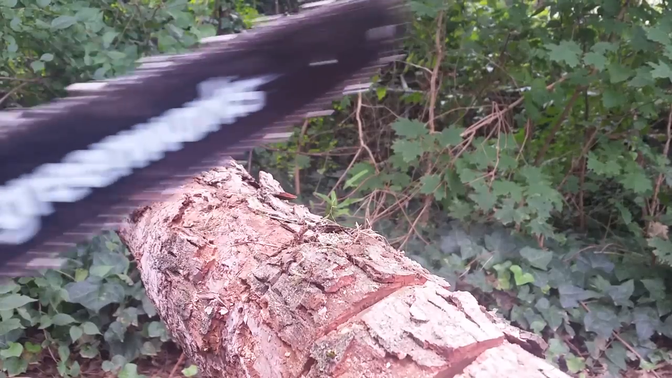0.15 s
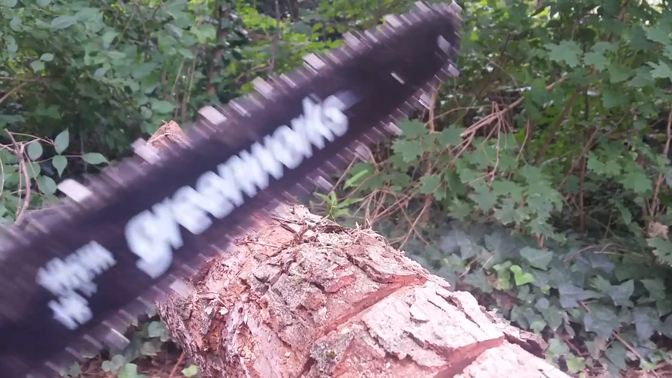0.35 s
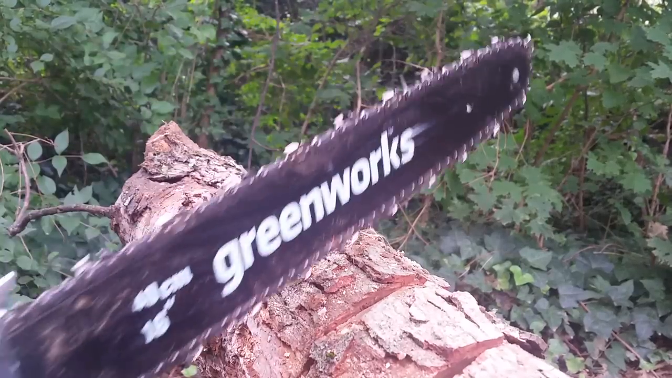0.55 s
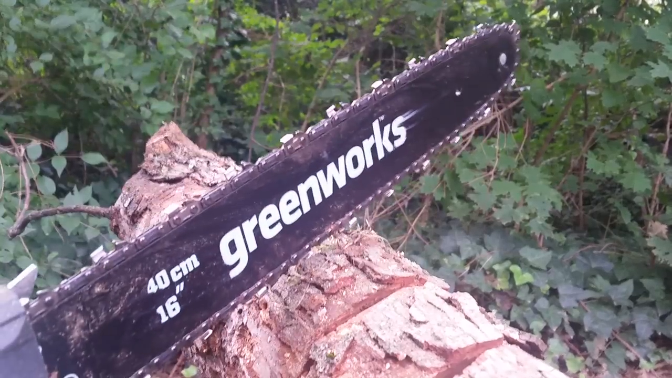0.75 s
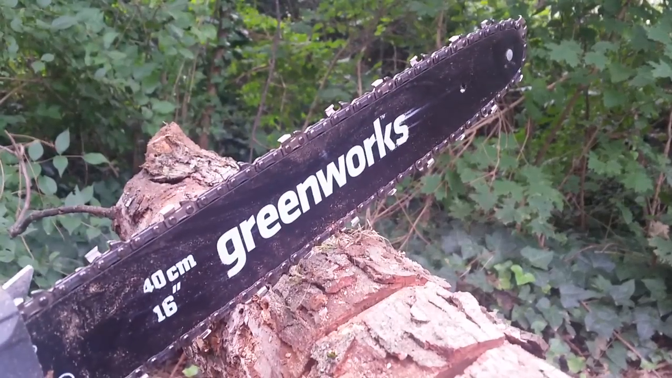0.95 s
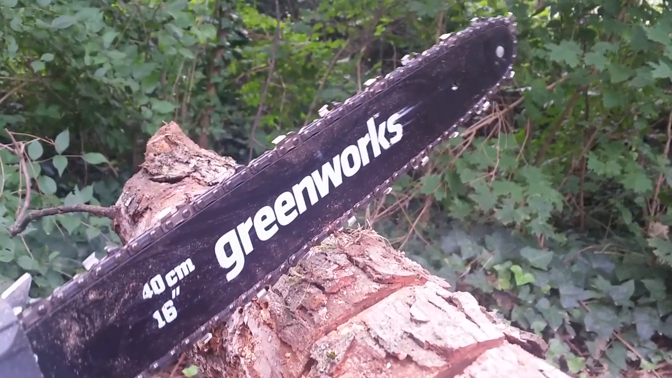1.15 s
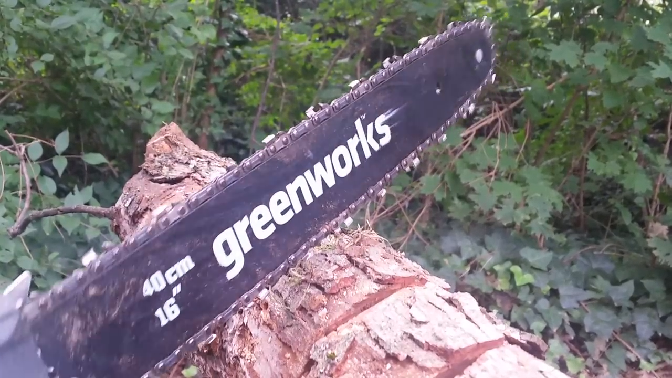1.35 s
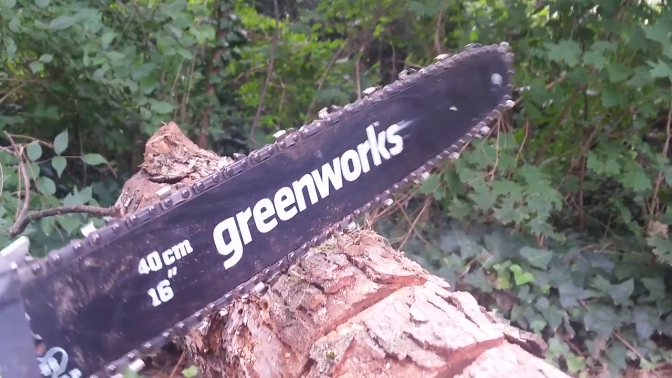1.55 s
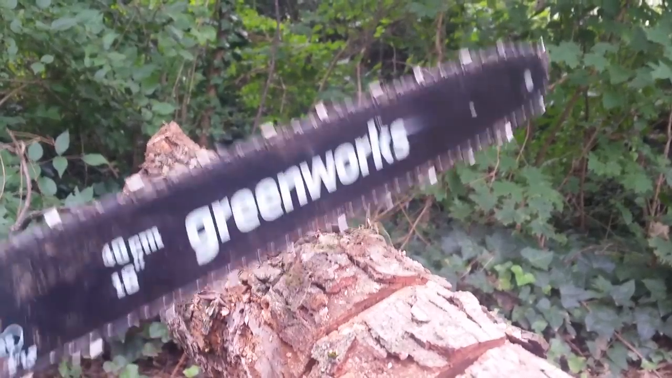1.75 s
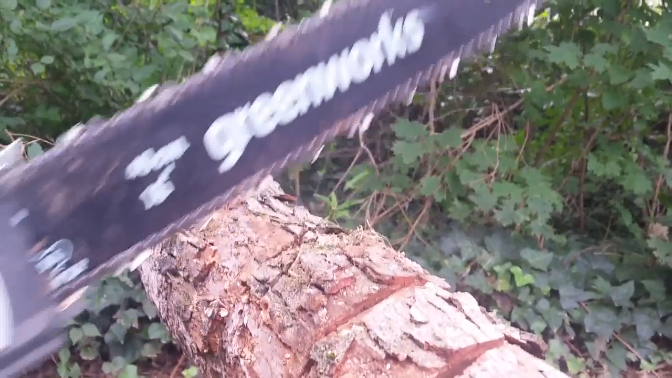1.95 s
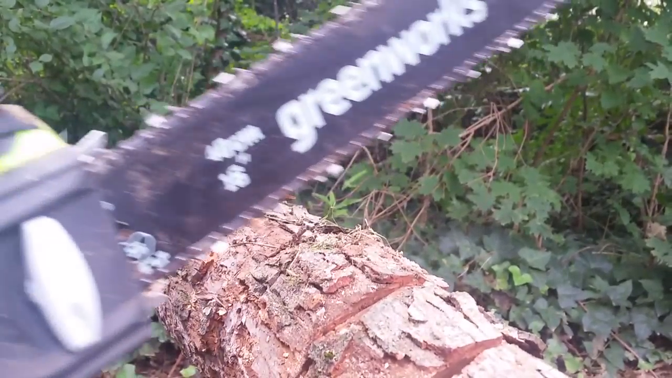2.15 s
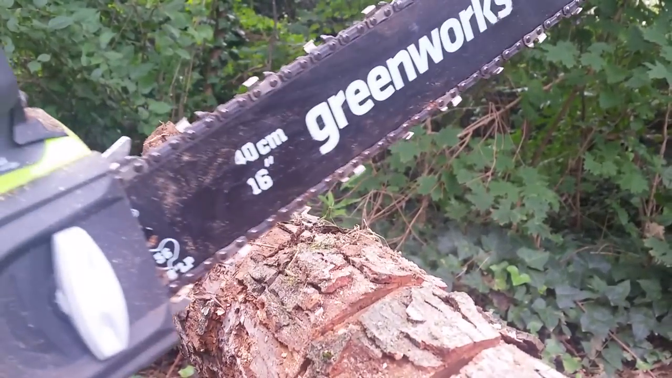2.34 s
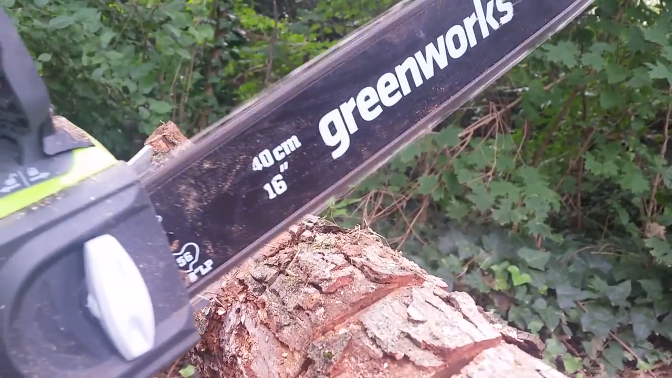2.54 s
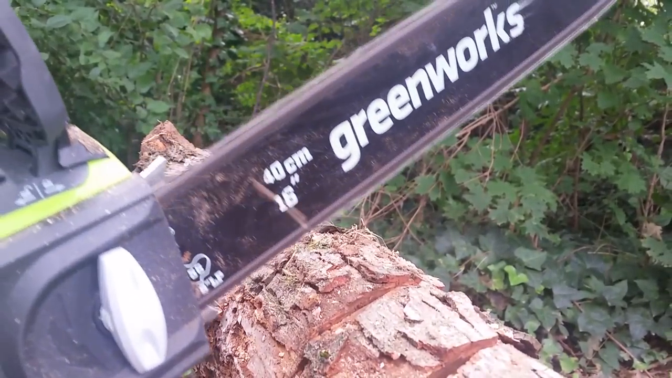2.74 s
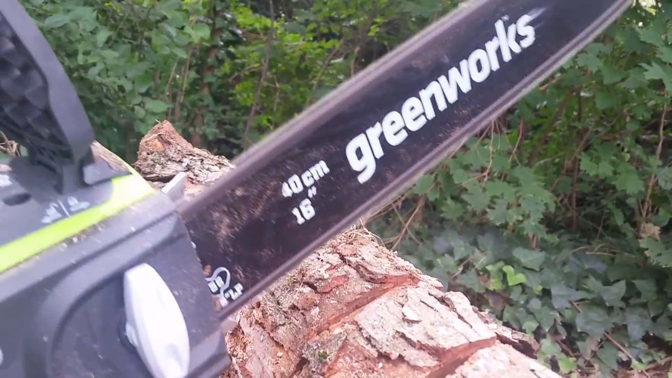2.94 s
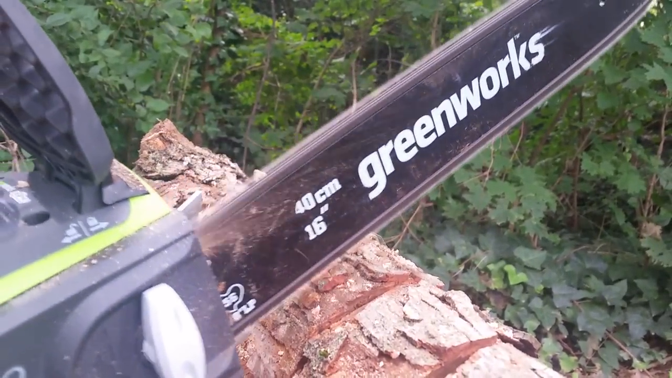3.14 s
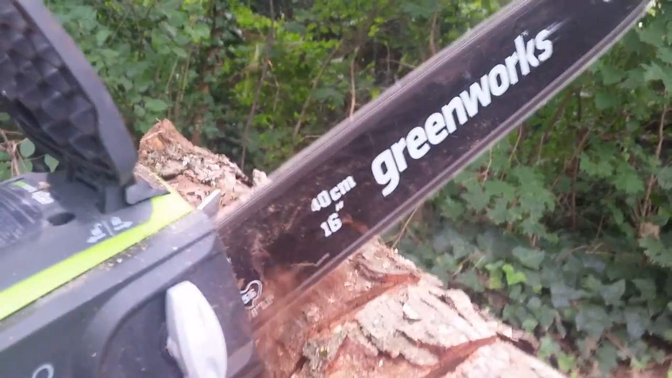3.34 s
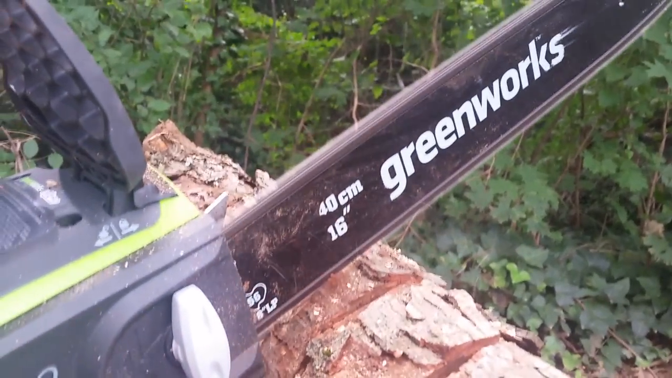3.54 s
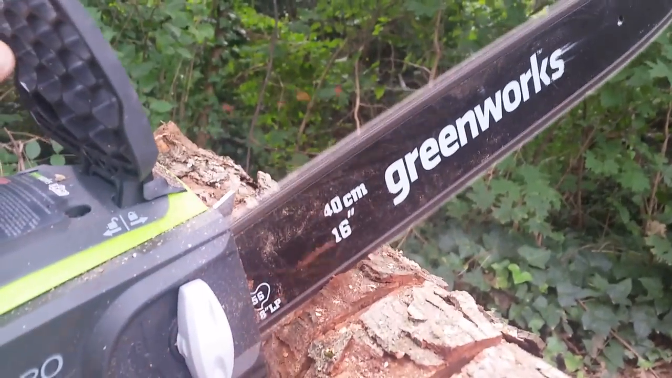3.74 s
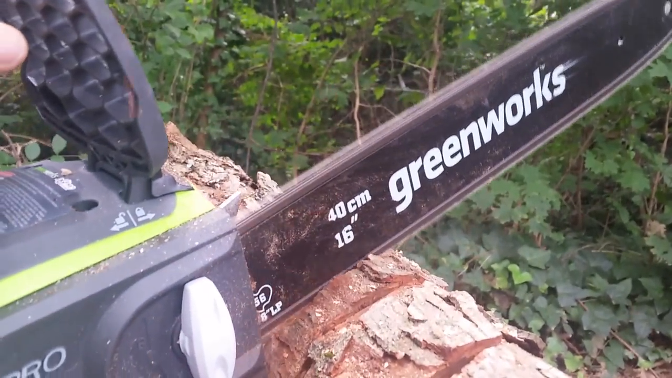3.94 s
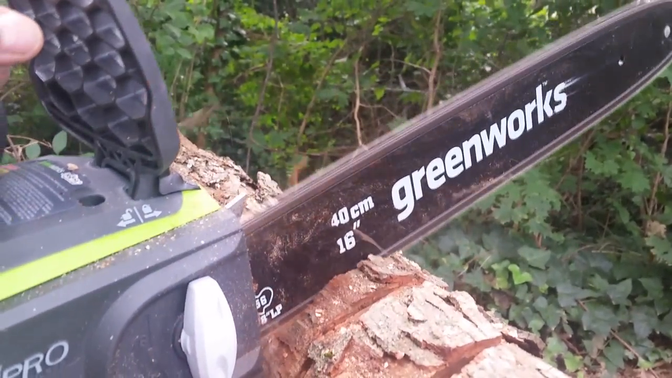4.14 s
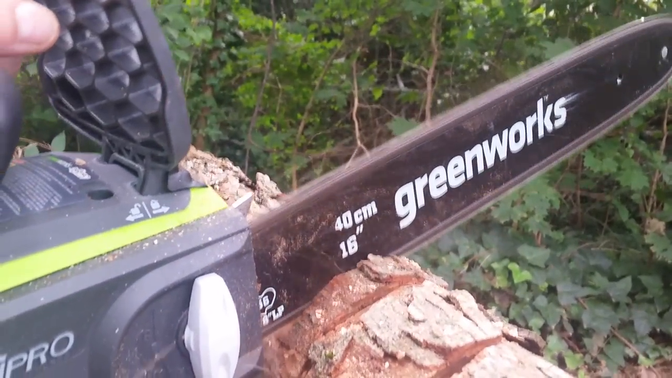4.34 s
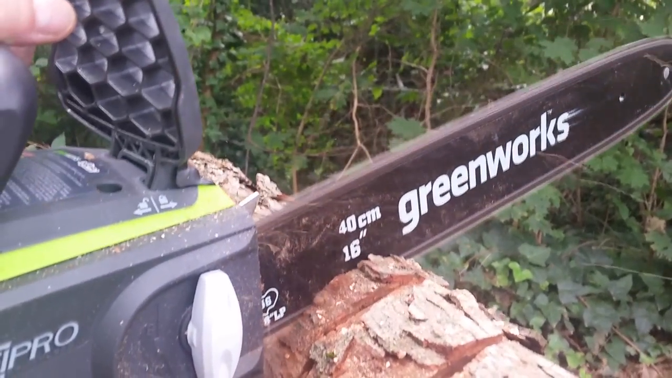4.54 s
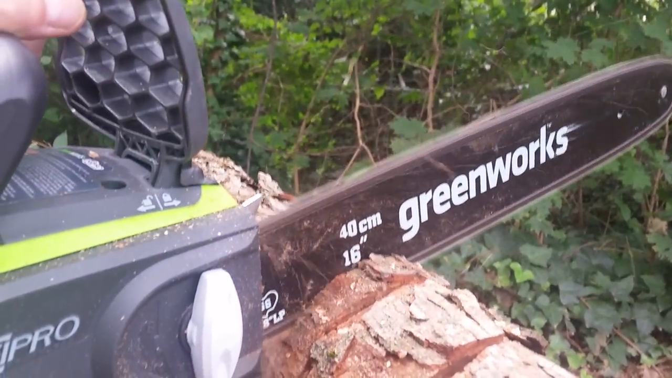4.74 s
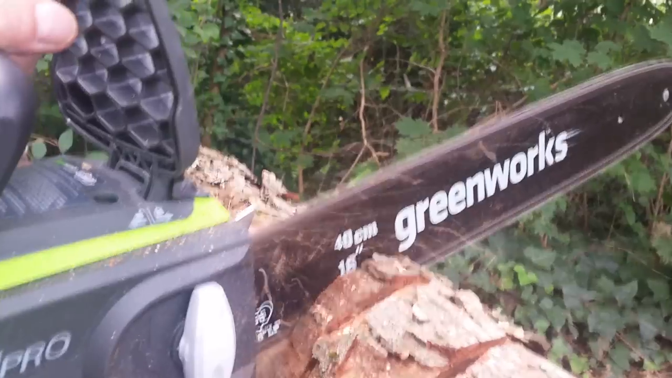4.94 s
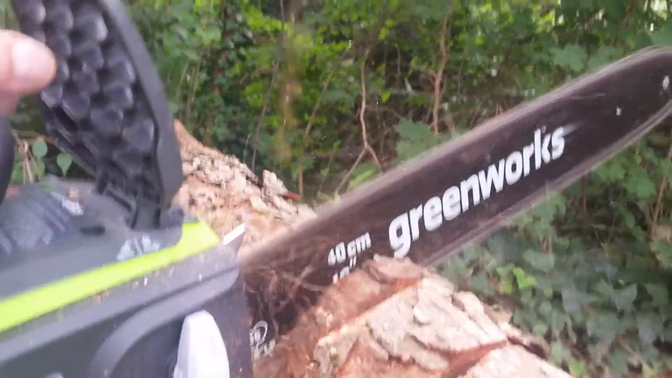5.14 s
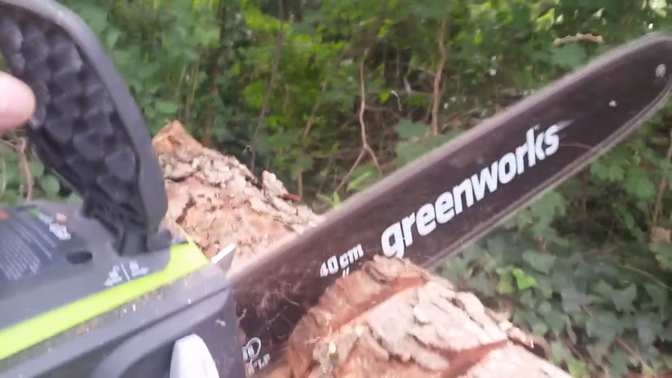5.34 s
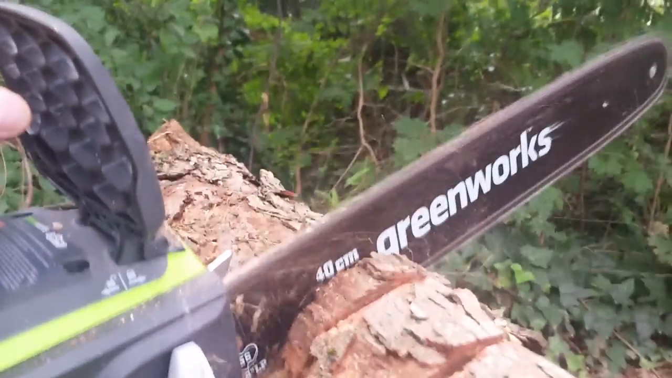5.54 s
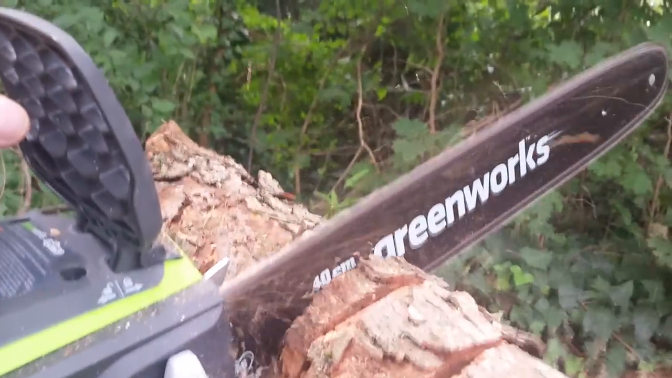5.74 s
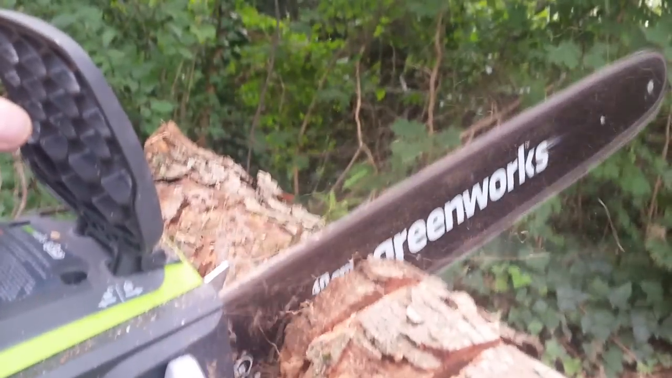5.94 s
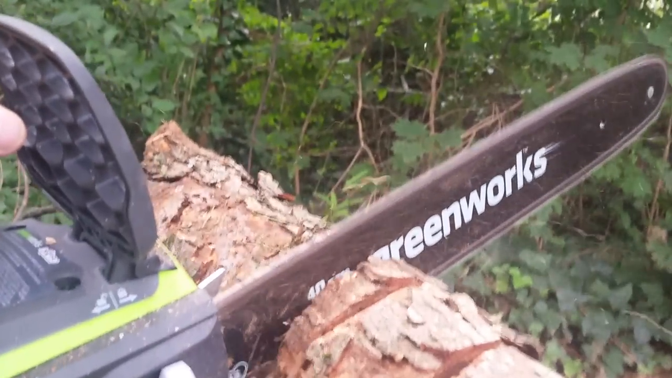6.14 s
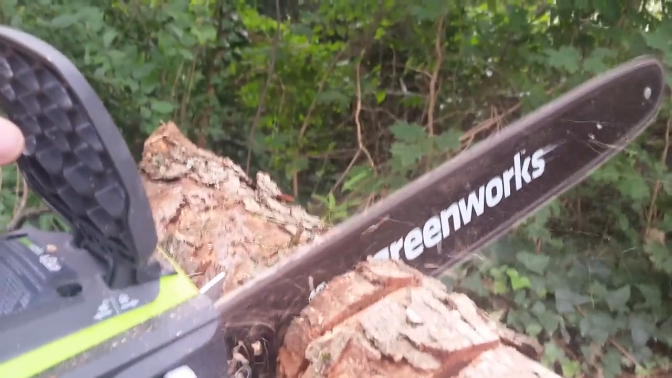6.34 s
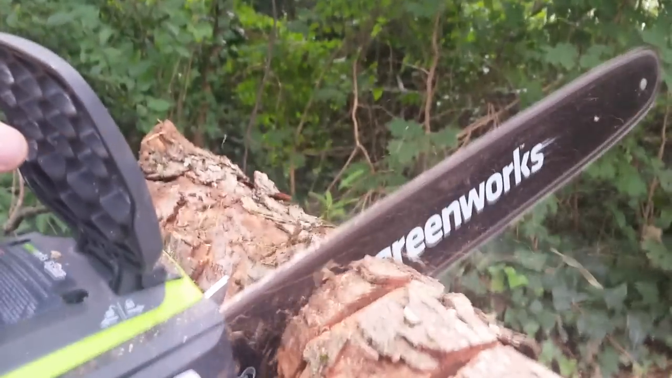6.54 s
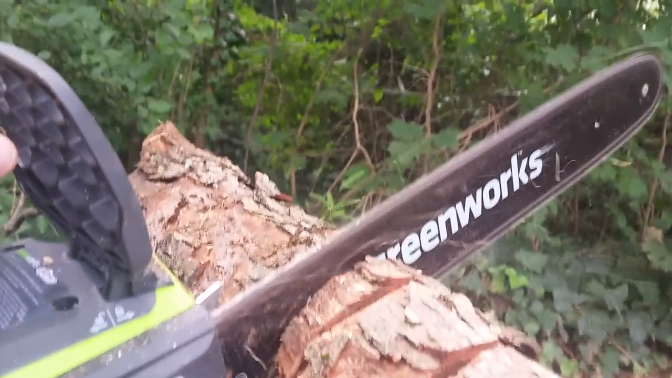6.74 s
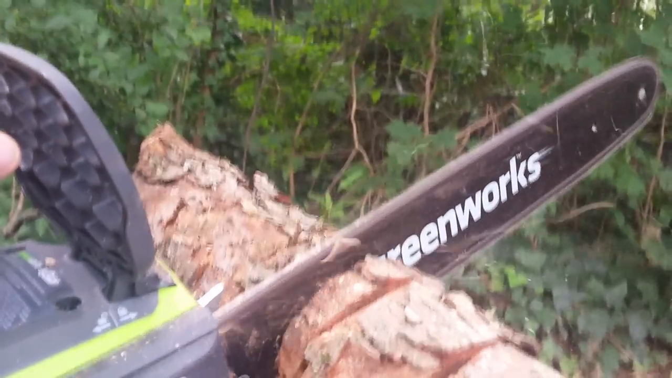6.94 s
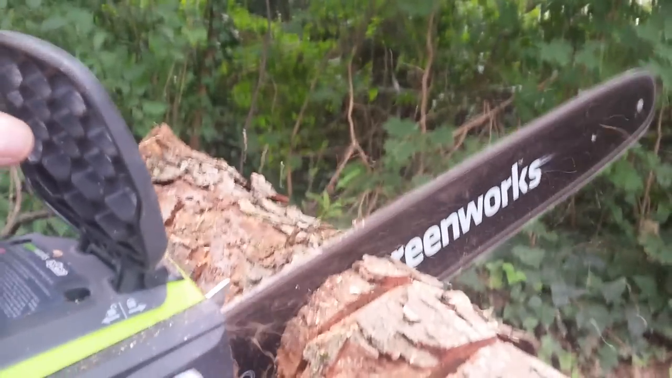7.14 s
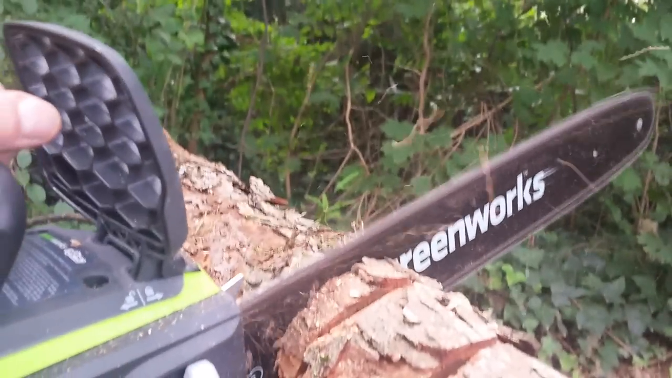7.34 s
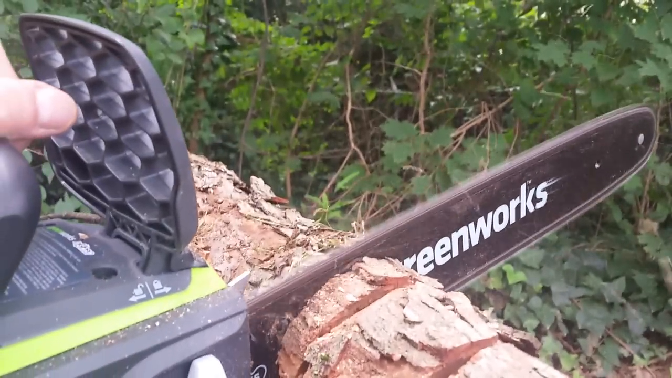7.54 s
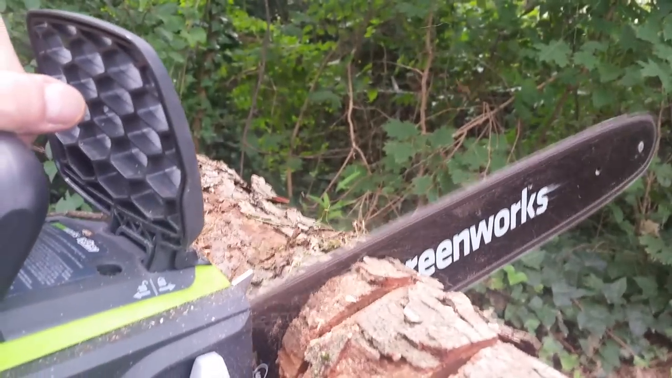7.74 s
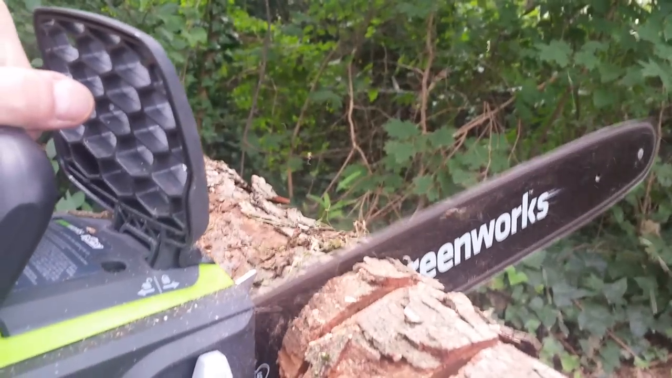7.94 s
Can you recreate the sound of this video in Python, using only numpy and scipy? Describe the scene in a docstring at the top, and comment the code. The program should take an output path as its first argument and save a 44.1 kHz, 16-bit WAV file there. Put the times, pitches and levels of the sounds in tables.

```python
"""Battery chainsaw in a quiet garden

A battery chainsaw is carried to a log, its hollow housing bumping and ticking in the hands: clicks set tones ringing.
The chain snaps taut, whines up to speed and sinks into the wood: tones and bursts of noise follow every link.
Links clatter round the sprocket and bar, cutters chatter in the kerf (the slot they cut) and chips spray.
The motor sags and recovers with the load. Filtered noise makes the garden air and the insects."""
import sys
import numpy as np
from scipy import signal
from scipy.fft import rfft, irfft, next_fast_len
from scipy.io import wavfile
from scipy.ndimage import uniform_filter1d

SR = 44100
rng = np.random.default_rng(int(sys.argv[2]) if len(sys.argv) > 2 else 0)


def generate_wav(signal):
    """Clip the signal to [-1, 1] and save it as 16-bit WAV at the path in sys.argv[1]."""
    frames = np.transpose(np.atleast_2d(signal))
    scaled = np.clip(frames, -1, 1) * 32767
    pcm = np.round(scaled).astype(np.int16)
    wavfile.write(sys.argv[1], SR, pcm)


N = 356328
TIME = np.arange(N) / SR  # seconds
SIZE = next_fast_len(N + SR // 2)
BINS = np.maximum(np.arange(SIZE // 2 + 1) * SR / SIZE, 1)  # Hz

# Colour of a high hiss, for flying chips and the sliding hand. Each row: pitch in Hz, level in dB per Hz.
HISS_SPECTRUM = [(4000, -14.5), (8600, -9.5), (10000, -3), (11500, -1), (12600, -2.5), (14000, -3),
                 (15800, -1.65)]

# The motor starts and gains speed evenly until the wood holds it back.
START_S, START_LINKS_PER_S, GAIN_LINKS_PER_S2 = 2.528, 52, 848
# The chain meets the bark, and its cutters take a moment to enter.
BITE_S, BITE_RISE_S = 3.07, 0.025
# Chain speed with no load and with the heaviest load.
FREE_LINKS_PER_S, LOADED_LINKS_PER_S = 577, 505


def from_db(db):
    """Turn decibels into a gain."""
    return 10 ** (np.asarray(db) / 20)


def rms_one(x):
    """Scale so that the mean of the channels has an rms (average strength) of 1."""
    return x / np.sqrt(np.mean(np.atleast_2d(x).mean(0) ** 2) + 1e-20)


def in_time(rows):
    """Draw straight lines between the points of a table, for each column at every sample."""
    s, *columns = np.transpose(rows)
    return [np.interp(TIME, s, column) for column in columns]


def at_hz(points, hz=BINS):
    """Read a curve over pitch on a log-frequency axis."""
    f, value = np.transpose(points)
    return np.interp(np.log(hz), np.log(f), value)


def lift(resonances, hz):
    """Add up the gains in dB of a set of resonances at these frequencies."""
    return sum(top / (1 + (2 * (hz - centre) / width) ** 2) for centre, width, top in resonances)


def swell_and_fade(peak_s, rise_s, fall_s):
    """Rise exponentially to 1 at the peak, then fall exponentially."""
    return np.exp(-np.maximum((peak_s - TIME) / rise_s, (TIME - peak_s) / fall_s))


def drift(rate):
    """Smooth random wander of spread 1; a higher rate wanders faster."""
    # made at every 20th sample, then joined by straight lines
    r = np.exp(-40 * np.pi * rate / SR)
    noise = rng.standard_normal(N // 20 + 2002)
    slow = rms_one(signal.lfilter([1], [1, -2 * r, r * r], noise)[2000:])
    return np.interp(np.arange(N) / 20, np.arange(len(slow)), slow)


def colour(x, gain_db):
    """Filter by a gain for every frequency."""
    return irfft(rfft(x, SIZE) * from_db(gain_db), SIZE)[..., :N]


def ring(x, hz, t60):
    """A unit click sets a sine of height 1 ringing, which falls by 60 dB in t60 seconds."""
    r = from_db(-60 / (t60 * SR))
    w = 2 * np.pi * hz / SR
    return signal.lfilter([0, np.sin(w)], [1, -2 * r * np.cos(w), r * r], x + 1e-18)


def noise_pair(likeness):
    """White noise for left and right, partly shared: likeness 1 means the same in both."""
    c = np.clip(likeness, -1, 1)
    mid, side = rfft(rng.standard_normal((2, N)), SIZE)
    return irfft(np.sqrt(1 + c) * mid + np.sqrt(1 - c) * side * [[1], [-1]], SIZE)[:, :N]


def noise_band(hz, width_hz):
    """A narrow band of noise, rms 1."""
    band = signal.butter(2, [hz - width_hz / 2, hz + width_hz / 2], "band", fs=SR, output="sos")
    return rms_one(signal.sosfilt(band, rng.standard_normal(N)))


def place(x, pan_db, lag_s=.00015):
    """Sound reaches the right side lag_s later; the left side is louder by pan_db."""
    left, right = np.broadcast_to(x, (2, N))
    gain = from_db(pan_db)
    late_right = np.pad(right, (abs(round(lag_s * SR)), 0))[:N]
    return np.array([gain * left, late_right]) * 2 / (1 + gain)


def garden():
    """Low distant rumble, rustling air and a chorus of insects, all made by colouring noise."""
    # Colour of the air. Each row: pitch in Hz, level in dB per Hz.
    air_spectrum = [(15, -43), (25, -19), (71, -1), (148, -8.5), (208, -17), (239, -6), (274, -20),
                    (376, -21), (484, -23.5), (518, -22.5), (651, -23.5), (1120, -24.5), (1480, -24),
                    (5800, -45.5), (7540, -79), (12800, -120)]
    # Balance of the air. Each row: pitch in Hz, left over right in dB.
    air_pan = [(60, -2.5), (110, -4), (200, -6.5), (380, -10), (700, -10.5), (1290, -11.5), (2380, -11),
               (4400, 2), (8120, -4.5), (15000, 0.0)]
    # How alike left and right are. Each row: pitch in Hz, likeness (1 is the same).
    air_likeness = [(60, 0.64), (130, 0.54), (290, 0.72), (1400, 0)]
    # Steady high buzz of insects in the trees. Each row: pitch in Hz, level in dB per Hz.
    insect_spectrum = [(3500, -21), (5800, -26), (6350, 1), (6800, 4), (7200, -0.5), (7800, -36),
                       (10000, -41), (15000, -22.5)]
    balance_db = at_hz(air_pan) * [[.5], [-.5]]
    air = rms_one(colour(noise_pair(at_hz(air_likeness)), at_hz(air_spectrum) + balance_db))
    insects = colour(noise_pair(.05), at_hz(insect_spectrum)) * from_db(0.91 * drift(30))
    sound = from_db(-39) * air + from_db(-53.0) * rms_one(place(insects, pan_db=-3.5))
    # the background sinks once the saw is running
    return sound * from_db(-11 * np.clip((TIME - 2.53) / 0.44, 0, 1))


def hand_slide():
    """A hand slides along the plastic grip: a faint high hiss swells up to its end, then stops."""
    hiss = rms_one(colour(noise_pair(.1), at_hz(HISS_SPECTRUM)))
    return from_db(-60) * hiss * swell_and_fade(peak_s=0.29, rise_s=0.12, fall_s=.03)


def clacks(crack=7, crack_s=0.0018, focus_db=5, snap=1.3, snap_s=.0005):
    """A hard contact snaps, cracks and rings the saw, most strongly near its own pitch."""
    # Contacts of grip, trigger, chain snatch and snags.
    # Each row: start in seconds, peak in dB, main ring in Hz.
    contacts = [(.2935, -28.5, 3000), (0.703, -18, 1150), (1.712, -29.5, 2100), (1.911, -32, 2900),
                (2.053, -35, 2500), (2.513, -17, 1000), (2.530, -5.5, 1730), (2.539, -26, 1600),
                (5.106, -4, 1120), (5.135, -11, 1600), (5.239, -7, 1900), (6.953, -20, 1900),
                (6.995, -21, 1900), (7.098, -25, 1600), (7.223, -15, 1000), (7.254, -22, 1900),
                (7.913, -9.5, 1600)]
    # What the saw rings with. Each row: pitch in Hz, level in dB, time to fall by 60 dB in seconds.
    saw_modes = [(503, 1, 0.042), (674, -10.5, 0.041), (997, 10, 0.027), (1150, 5, 0.021),
                 (1560, -2, 0.075), (1770, 4.5, 0.058), (2600, 13, 0.0076), (3240, 2, 0.039),
                 (4470, 10, 0.0081), (5500, -27, .01)]
    out, t = np.zeros(N), TIME[:SR // 8]
    dull = signal.butter(1, 3500, fs=SR)  # every snap is dull above 3500 Hz
    for s, peak_db, main_hz in contacts:
        around = signal.butter(1, [main_hz * 0.62, main_hz * 1.2], "band", fs=SR, output="sos")
        crack_noise = crack * rng.standard_normal(len(t)) * np.exp(-t / crack_s)
        snap_noise = snap * rng.standard_normal(len(t)) * np.exp(-t / snap_s)
        hit = signal.sosfilt(around, crack_noise) + signal.lfilter(*dull, snap_noise)
        for hz, level_db, t60 in saw_modes:
            octaves_away = abs(np.log2(hz / main_hz))
            gain = from_db(level_db - focus_db * octaves_away - 60 * t / t60)
            hit += gain * np.sin(2 * np.pi * hz * t) * rng.choice([-1, 1])
        at = round(s * SR)
        out[at:at + len(t)] += from_db(peak_db) * hit / np.abs(hit).max()
    return place(out, pan_db=-13.0)


def housing():
    """The hollow housing booms at one low pitch, when bumped and under the shaking of the cut."""
    # Soft bumps from the hands and from lurches in the cut. Each row: start in seconds, boom peak in dB.
    bump_list = [(0.771, -19.5), (0.982, -37), (1.061, -38.5), (1.468, -28), (1.578, -18.5), (1.688, -27.5),
                 (1.799, -36), (1.894, -35.5), (3.385, -29), (3.665, -30), (4.29, -29), (5.09, -32),
                 (5.27, -27), (5.5, -31.5), (5.755, -31), (5.95, -31), (6.171, -35), (6.33, -29),
                 (6.44, -27.5), (6.561, -30), (7.041, -25), (7.15, -28.5), (7.286, -28), (7.61, -31),
                 (8.008, -30)]
    # Steady shaking by the cut. Each row: time in seconds, strength in dB before a trim.
    shaking = [(3.0, -65), (3.15, -39.5), (3.35, -40), (4.7, -34), (5.2, -42.5), (6.75, -40.5), (6.95, -33),
               (8.08, -33)]
    housing_hz = 246.6

    def swell(x):
        """Two rings in a row make the boom swell before it fades."""
        return ring(ring(x, housing_hz, t60=0.24), housing_hz * 0.95, t60=0.085)

    pushes = np.zeros(N)
    for s, level_db in bump_list:
        pushes[round(s * SR)] = from_db(level_db)
    one_click = 1. * (TIME == 0)
    bumps = swell(pushes) / np.abs(swell(one_click)).max()
    # its walls add a short higher knock
    knock = 0.25 * ring(pushes, 485, t60=0.094) + 0.13 * ring(pushes, 600, t60=0.09)
    shake_db, = in_time(shaking)
    boom = noise_band(housing_hz + 3, 28.0)
    # an even drone of wavering pitch that swells with the shaking
    boom /= np.sqrt(uniform_filter1d(boom ** 2, SR // 16) + 0.09)
    boom *= from_db(shake_db - 2.5) * np.clip((TIME - 2.8) / .1, 0, 1)
    return place(bumps, pan_db=29) + place(knock, pan_db=13) + place(boom, pan_db=19)


def chain_motion():
    """Chain speed (links per s), how far it is in the wood, motor load and how far the kerf shields the chain
    (all 0-1)."""
    # Speed that the wood allows the chain. Each row: time in seconds, links per second.
    cut_speed = [(3.06, 508), (3.17, 566), (3.53, 577), (3.67, 566), (3.9, 567), (4.15, 556), (4.55, 550),
                 (4.8, 543), (4.95, 530), (5.19, 517), (5.25, 572), (5.29, 515), (5.48, 518), (5.6, 528),
                 (5.97, 530), (6.11, 545), (6.37, 523), (6.54, 519), (6.67, 558), (6.9, 537), (7.23, 533),
                 (7.41, 505), (7.52, 507), (7.62, 531), (7.87, 544)]
    # How far the kerf shields the chain. Each row: time in seconds, shielding from 0 to 1.
    kerf_shield = [(3.07, 0), (4.1, 0.48), (5.05, 0.35), (5.2, 1), (8.08, 0.46)]
    allowed, = in_time(cut_speed)
    speeding_up = START_LINKS_PER_S + GAIN_LINKS_PER_S2 * np.maximum(TIME - START_S, 0)
    speed = np.minimum(speeding_up, allowed)
    in_wood = np.clip((TIME - BITE_S) / BITE_RISE_S, 0, 1)
    # the load is read from how far the speed has sagged
    load = in_wood * (FREE_LINKS_PER_S - speed) / (FREE_LINKS_PER_S - LOADED_LINKS_PER_S)
    depth, = in_time(kerf_shield)
    return speed, in_wood, load, depth


def impacts(links, spread_db, decay, steady, count=56):
    """Each strike dies away (decay in strike periods); part of its strength returns every count strikes."""
    index = links.astype(int)
    returning = .5 * rng.standard_normal(count)[index % count]
    strength_db = spread_db * np.clip(returning + rng.standard_normal(SR)[index], -2.2, 2.2)
    return steady + from_db(strength_db) * np.exp(-(links % 1) / decay)


def whine(links, speed, crawl, in_wood, load, depth, clatter_db, bounce,
          flutter=0.075, rough=0.23, slack=0.14):
    """Links meeting the sprocket give a tone; cutters on every second link add half orders in the wood."""
    # Weaker tones of the drive. Each row: multiple of the link rate, dB against the clatter
    # before the clearness and resonances are added.
    overtones = [(1.5, -28), (2.5, -21), (3, -18), (3.5, -25), (4, -20.5), (4.5, -24), (5, -18), (6, -27),
                 (7, -21), (8, -25)]
    # Resonances that those tones sweep through. Each row: centre in Hz, width in Hz, lift in dB.
    swept = [(680, 220, 19), (1610, 140, 7.5), (2220, 420, 6), (2238, 30, 9)]
    # Level of the link tone and its octave at the pitch they pass through. Each row: Hz, dB.
    tone_response = [(120, -65), (275, -58), (370, -34), (480, -32), (530, -23.5), (570, -23), (740, -20.5),
                     (880, -26), (1140, -27.5)]
    # overtones are clearer (4.5 dB) while the chain runs free; at a crawl it only rattles
    crawl_loss_db = -47 * crawl
    clear_db = 4.5 + (1 - 4.5) * in_wood + crawl_loss_db
    # after its hardest snag the chain runs raggedly and the link tone breaks up
    ragged = swell_and_fade(peak_s=5.33, rise_s=.05, fall_s=0.14)
    # the tone weakens when the chain labours deep in the kerf
    tone_db = at_hz(tone_response, speed) - 10.5 * (load * depth) ** 2 - 6 * ragged
    # the octave is stronger while running free, and fades with depth and load
    octave_db = at_hz(tone_response, 2 * speed) + 2.5 * (1 - in_wood)
    octave_db += -7 * depth - 5 * load + crawl_loss_db
    phase = 2 * np.pi * (links + slack * bounce * drift(45))
    tone_flutter = 1 + (flutter + 0.24 * bounce + 0.65 * ragged) * drift(44)
    tone = from_db(tone_db) * np.sin(phase) * tone_flutter
    upper = from_db(octave_db) * np.sin(2 * phase) * (1 + rough * drift(30))
    for multiple, level_db in overtones:
        gain = from_db(clatter_db + clear_db + level_db + lift(swept, multiple * speed))
        if multiple % 1:  # half orders sound only in the wood
            gain = gain * in_wood
        upper += gain * np.sin(multiple * phase + 0.42 * drift(21)) * (1 + 0.34 * drift(19.0))
    return np.sqrt(2) * (place(tone, pan_db=-9.5) + place(upper, pan_db=-11))


def chain_noise(links, jolt, knock_db, clatter_db, rasp_db, spray_db):
    """Each link hit is a short burst in the steel and the wood; the cutters tear off chips in spurts."""
    # Colours of the knocking, clatter and rasp. Each row: pitch in Hz, level in dB per Hz.
    knock_spectrum = [(40, -36), (180, -24), (300, -13.5), (350, -5.5), (400, -6.5), (480, 1.5), (570, 7),
                      (680, 4), (800, 3), (900, -5.5), (1150, -0.5), (2000, -52)]
    clatter_spectrum = [(150, -51), (400, -9), (800, -13), (950, 0), (1200, 1.5), (1480, -7.5),
                        (2200, -1.5), (2650, -1), (3100, -11), (5000, -44)]
    rasp_spectrum = [(1500, -52), (2600, -15.5), (3100, 3), (3800, 1), (4500, 2.5), (5100, 1), (5550, 3.5),
                     (6200, -4), (7500, -5), (8800, -16), (12000, -67)]
    # Resonances of bar and sprocket cover. Each row: centre in Hz, width in Hz, lift in dB.
    bar_modes = [(1017, 104, 6), (1390, 164, 5.5), (1596, 200, 8), (1900, 200, 9.5), (2060, 230, 4.5)]
    # Air resonance of the sprocket cover. Each row: centre in Hz, width in Hz, lift in dB.
    cover_modes = [(572, 55, 4.5)]
    hits = impacts(links, spread_db=1.0, decay=0.65, steady=0.28) * jolt
    # cutters sit on every second link
    tearing = impacts(links / 2, spread_db=1.5, decay=1.0, steady=0.9) * from_db(0.97 * drift(44))
    knock = colour(hits * noise_pair(1.0), at_hz(knock_spectrum) + lift(cover_modes, BINS))
    clatter = colour(hits * noise_pair(0.68), at_hz(clatter_spectrum) + lift(bar_modes, BINS))
    rasp = colour((hits + 0.24 * tearing) * noise_pair(0.16), at_hz(rasp_spectrum))
    spray = colour(tearing * noise_pair(0.083), at_hz(HISS_SPECTRUM))
    sound = rms_one(place(knock, pan_db=-7.5)) * from_db(knock_db + 3.0)
    sound += rms_one(place(clatter, pan_db=-16.0, lag_s=.00016)) * from_db(clatter_db - 1.23)
    sound += rms_one(place(rasp, pan_db=-9.0)) * from_db(rasp_db + 0.37)
    return sound + rms_one(place(spray, pan_db=0.5)) * from_db(spray_db + 3.5)


def running_saw(speed, in_wood, load, depth):
    """Speed times every link; speed, load and depth set levels; the bar bounces at two uneven rates."""
    # Bar bouncing in the kerf. Each row: time in seconds, strength of the bounce from 0 to 1.
    bouncing = [(2.5, 0.01), (4.8, 0), (5.15, 0.24), (5.6, 0.09), (6.8, 0.01), (7.0, 0.39), (7.3, 0.07),
                (7.55, 0.16), (8.08, 0.2)]
    # How loud each noise of the chain is, before a final trim. Each holds, in dB: level running free,
    # then the changes at a crawl, in the wood, at the first bite, at full load and at full depth.
    knock_law = (-34, 17, -2, -0.5, 6, -1.54)
    clatter_law = (-23.5, -15, -2.5, 1, 3, -2)
    rasp_law = (-29, -19.5, .3, -0.5, 0.6, -5)
    spray_law = (-30, -37, -0.03, 2.5, 0.6, -1.67)
    crawl = np.maximum(1 - speed / 229, 0) ** 2  # below 229 links per s the chain crawls
    # the first bite into the bark dies away
    bite = swell_and_fade(BITE_S + 0.053, rise_s=0.044, fall_s=0.52)
    surge_db = 0.68 * in_wood * drift(7)  # the cutters grab unevenly

    def level_db(law):
        """Add up what the motion of the chain does to one noise."""
        free, slow_change, cutting, biting, loaded, deep = law
        running = free + slow_change * crawl + cutting * in_wood
        return running + biting * bite + loaded * load + deep * depth + surge_db

    clatter_db = level_db(clatter_law)
    bounce, = in_time(bouncing)
    links = np.cumsum(speed) / SR  # links passed so far
    # two bounces, near 29 and 69 per second
    slow = np.sin(2 * np.pi * np.cumsum(29 + 2.055 * drift(3.84)) / SR)
    fast = np.sin(2 * np.pi * np.cumsum(69 + 1.31 * drift(2.84)) / SR)
    jolt = 1 + bounce * (.9 * slow + .65 * fast)
    shaken_links = links + .15 * bounce * slow
    sound = whine(shaken_links, speed, crawl, in_wood, load, depth, clatter_db, bounce) * jolt
    sound += chain_noise(links, jolt, level_db(knock_law), clatter_db,
                         level_db(rasp_law), level_db(spray_law))
    return sound * np.clip((TIME - START_S) / 0.013, 0, 1)


def rubbing(in_wood, depth):
    """The chain squeals once in the bar groove, and the log judders more as the kerf closes round the chain."""
    attack_s, hold_s, release_s = 0.033, .05, 0.057
    age = TIME - 3.46  # seconds since the squeal began
    fade = np.exp(-np.maximum(age - attack_s - hold_s, 0) / release_s)
    envelope = np.clip(age / attack_s, 0, 1) * fade
    squeal = (noise_band(3980, 170) + noise_band(4560, 260)) * from_db(-29.5) * envelope
    # -50.5 dB when the kerf fully shields the chain, 11 dB less when it does not
    judder = noise_band(123.0, 33) * from_db(-50.5 - 11 * (1 - depth)) * in_wood
    return place(squeal, pan_db=-14) + place(judder, pan_db=-4.0)


def scene():
    """Garden, handling and saw together."""
    speed, in_wood, load, depth = chain_motion()
    sound = garden() + hand_slide() + clacks() + housing()
    return sound + running_saw(speed, in_wood, load, depth) + rubbing(in_wood, depth)


def record(dry):
    """The deepest bass is thinned, peaks are rounded and the top is cut steeply."""
    sound = signal.sosfilt(signal.butter(2, 30, "high", fs=SR, output="sos"), dry)
    sound = 1.3 * np.tanh(sound / 1.3)
    top_cut = signal.ellip(12, .1, 80, 15900, fs=SR, output="sos")  # cut above 15900 Hz
    return signal.sosfilt(top_cut, sound)


dry = scene()
out = record(dry)
generate_wav(out)
```